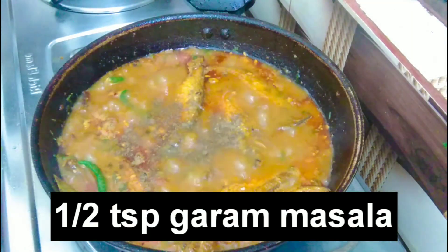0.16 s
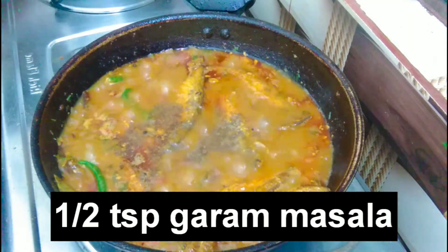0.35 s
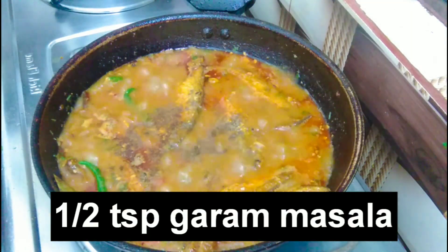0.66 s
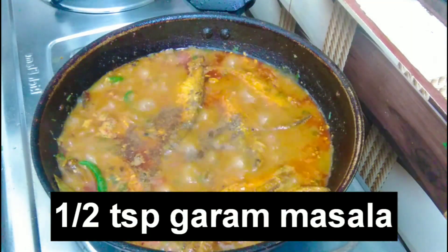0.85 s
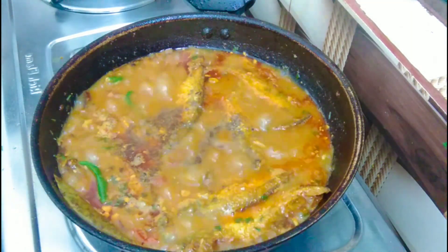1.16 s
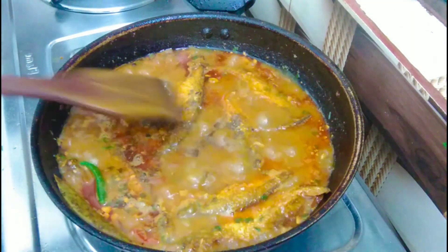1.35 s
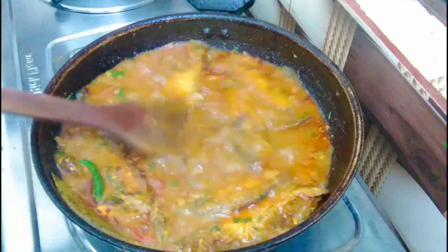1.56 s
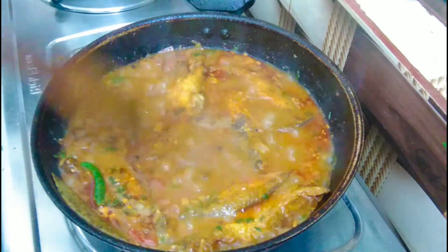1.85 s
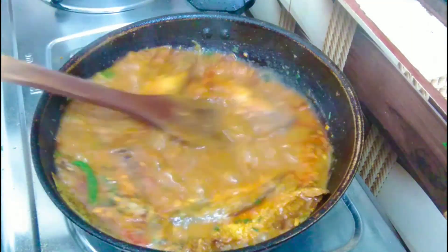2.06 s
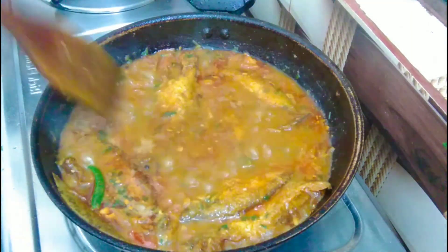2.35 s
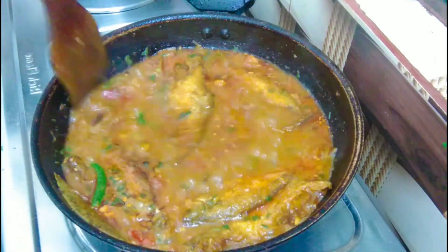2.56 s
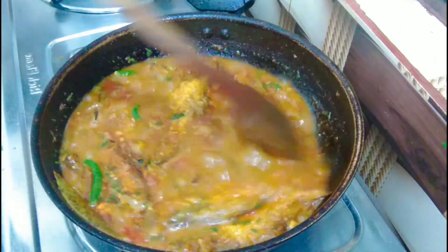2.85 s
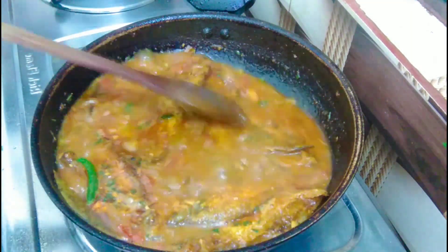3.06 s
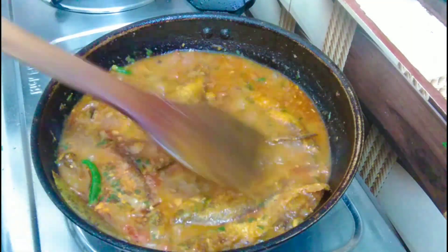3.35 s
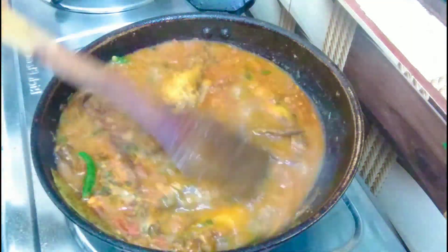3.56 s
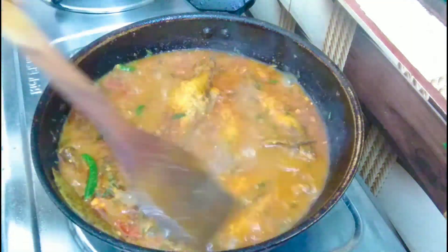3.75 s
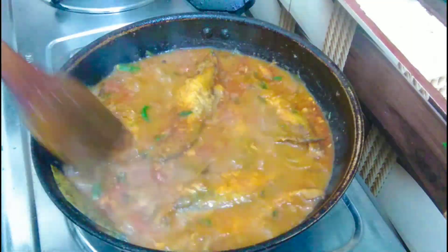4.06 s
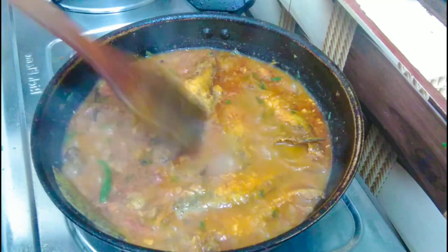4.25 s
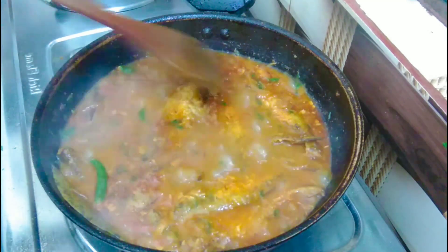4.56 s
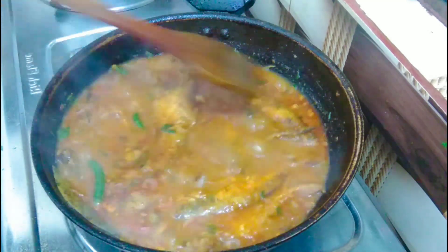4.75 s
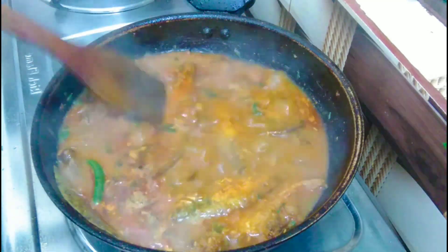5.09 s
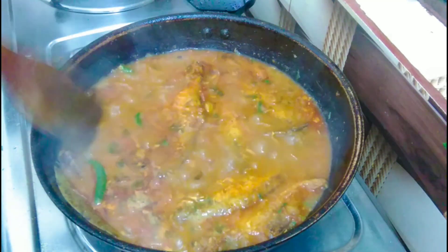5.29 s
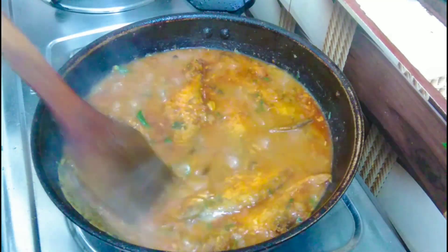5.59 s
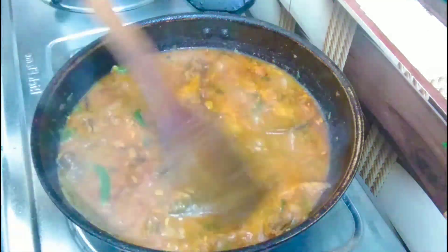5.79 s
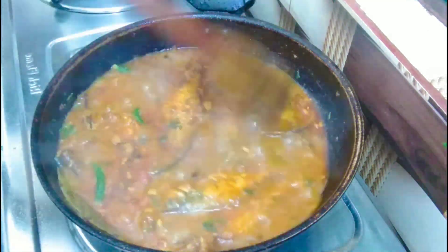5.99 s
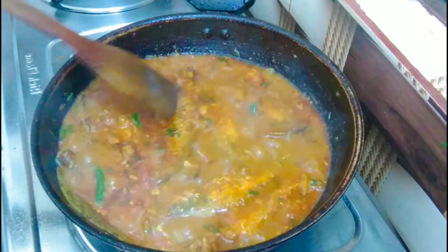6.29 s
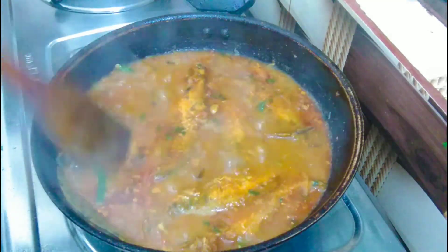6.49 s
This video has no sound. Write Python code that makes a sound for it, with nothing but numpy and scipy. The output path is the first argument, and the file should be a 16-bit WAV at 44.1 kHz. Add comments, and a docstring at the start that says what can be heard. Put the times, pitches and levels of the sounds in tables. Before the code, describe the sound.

A thick curry simmers throughout, heard from close above in a small kitchen with short reflections. Fine bright fizz and coarser crackling froth fluctuate constantly, dotted with round wet pops, blips, faint low glugs and sharp oil spits. Around 0.6 s a short rasp of steam escapes with a soft scuff; a stronger pop comes near 0.95 s. The boil swells, then at 1.26 s everything drops silent for about a twentieth of a second and returns at 1.31 s with a hard, dry double click. From 2.5 s a wooden spoon gives muted knocks and drags, with low squelches; the clearest thud is at 3.56 s. A snappy pop lands at 4.03 s, the froth sinks around 4.3 s and recovers by 4.8 s. More soft knocks follow near 5.1, 5.4 and 5.7 s. Thin high steam whistles appear at 6.3 s, then a sharp spit at 6.5 s as simmering continues.

```python
"""Curry simmering in a pan

Curry simmers on a kitchen stove, heard from close above. Oil fizzes and froth crackles as swarms of
tiny ringing bubbles with noise; larger bubbles pop or glug as short notes, and drops spit as noise bursts.
A wooden spoon knocks the pan's ringing modes and squelches through the sauce; steam whistles thinly.
Early on, the sound drops out for an instant and returns with a sharp click.
"""
import sys
import numpy as np
from scipy import signal
from scipy.fft import rfft, irfft
from scipy.io import wavfile
from scipy.ndimage import uniform_filter1d

SR = 44100
rng = np.random.default_rng(int(sys.argv[2]) if len(sys.argv) > 2 else 0)


def file_out(sig):
    """Save sig as 16-bit WAV at sys.argv[1]."""
    # one column per channel
    cols = np.atleast_2d(sig).T
    # limit, then scale
    lim = np.clip(cols, -1, 1)
    pcm = np.round(lim * 32767).astype(np.int16)
    wavfile.write(sys.argv[1], SR, pcm)


N = 292383
TIME = np.arange(N) / SR
SWELL_LIMIT = 1.2  # random swells stop growing here, in multiples of their rms


def gain_of(db):
    """Turns decibels into an amplitude factor."""
    return 10 ** (np.asarray(db) / 20)


def evened(x):
    """Scales a sound to an rms of 1."""
    return x / np.sqrt(np.mean(x ** 2) + 1e-20)


def read(points, hz):
    """Reads a curve between its points on a log-frequency axis."""
    f, value = np.transpose(points)
    return np.interp(np.log(hz + 1), np.log(f + 1), value)


def follow(rows):
    """Draws one gain curve over the whole scene for each level column."""
    s, *columns = np.transpose(rows)
    return [gain_of(np.interp(TIME, s, column)) for column in columns]


def add(mix, s, sound):
    """Mixes a sound in at a time in seconds."""
    part = mix[max(round(s * SR), 0):][:len(sound)]
    part += sound[:len(part)]


def coloured(x, spectrum):
    """Filters a sound to a spectrum, with no response before its cause (minimum phase)."""
    hz = abs(np.fft.fftfreq(4096, 1 / SR))
    log_gain = np.log(gain_of(read(spectrum, hz)))
    taps = np.fft.ifft(np.exp(np.conj(signal.hilbert(log_gain)))).real
    return signal.oaconvolve(x, taps[:len(taps) // 2])[:len(x)]


def wander(rate_hz):
    """Makes a random drift of rms 1, with movement faster than the rate smoothed away."""
    hz = np.fft.rfftfreq(N, 1 / SR)
    smoothed = rfft(rng.standard_normal(N)) / (1 + (hz / rate_hz) ** 2)
    return evened(irfft(smoothed, N))


def restless(depth_db):
    """A gain that drifts by chance as patches of the pan boil up and settle."""
    return gain_of(depth_db * wander(rate_hz=21.7))


def ring(hz, cycles):
    """A bursting film: the cavity swells into its note over the given cycles, then dies away."""
    turns = np.arange(int(8 * cycles * SR / hz) + 2) * hz / SR
    u = turns / cycles
    return u * np.exp(1 - u) * np.sin(2 * np.pi * turns)


def swarm(per_s, low_hz, high_hz, cycles, spread_db, clump_db, count=24):
    """Bubbles of many sizes burst at random, like sizes in clumps; a few are far louder than the rest."""
    out = np.zeros(N)
    # six neighbouring sizes share one clump
    for sizes_hz in np.geomspace(low_hz, high_hz, count).reshape(-1, 6):
        clump = gain_of(clump_db * np.minimum(wander(18), SWELL_LIMIT))
        for hz in sizes_hz:
            chance, size = rng.random(N), rng.exponential(1, N)
            at = chance < per_s / count / SR
            clicks = np.zeros(N)
            clicks[at] = clump[at] * gain_of(spread_db * np.minimum(size[at], 3))
            note = rng.choice([-1, 1]) * ring(hz, cycles) * np.sqrt(hz)
            out += signal.oaconvolve(clicks, note)[:N]
    return evened(out)


def patchy(x, depth_db, span_s, span_hz):
    """Groups of like-sized bubbles come and go: the level drifts in patches of time and pitch."""
    z = signal.stft(x, SR, nperseg=256, noverlap=192)[2]
    field = rng.standard_normal(z.shape)
    for _ in range(2):
        field = uniform_filter1d(field, max(round(span_s * SR / 64), 1), axis=1)
        field = uniform_filter1d(field, max(round(span_hz * 256 / SR), 1), axis=0)
    gain = gain_of(depth_db * np.minimum(evened(field), SWELL_LIMIT))
    return signal.istft(z * gain, SR, nperseg=256, noverlap=192)[1][:N]


def sizzle(frothing):
    """Levels of fizz and froth, sinking in lulls and flaring on hot metal; and a gain for the coarse fizz."""
    # lulls in which the sizzle dies away: middle t/s, length/s, fizz sinks by/dB, froth sinks by/dB
    lulls = [(0.122, 0.023, 5, 17), (0.312, 0.079, 2.5, 6), (0.983, 0.044, 5, 20), (1.467, 0.12, 0, 10),
             (1.632, 0.042, 1, 15), (1.682, 0.03, -1, 11), (2.05, 0.038, 3, 3), (2.435, 0.073, 1.5, 6),
             (2.637, 0.13, 2.5, 7), (3.498, 0.035, 6, 3), (3.706, 0.059, 8, 5), (4.323, 0.076, 7.5, 23),
             (4.537, 0.042, 4, 5), (4.655, 0.14, 1.5, 24), (4.826, 0.078, -0.5, 27), (5.314, 0.058, 2.5, 7),
             (5.776, 0.11, -1.5, 10.5), (6.013, 0.12, 5, 1.5), (6.572, 0.026, 8, -4)]
    # the spoon washes sauce onto hot metal: t/s, length/s, fizz level/dB, froth level/dB
    flares = [(0.708, 0.023, -62, -49.5), (1.991, .03, -50, -46), (2.525, 0.084, -49.5, -49.5),
              (2.764, 0.17, -55.5, -52), (3.202, 0.017, -46.5, -52), (3.721, 0.015, -61, -37),
              (3.863, 0.027, -46, -47.5), (4.026, 0.017, -43.5, -49), (4.397, 0.096, -52, -53.5),
              (4.555, 0.023, -48.5, -57), (5.03, 0.092, -48, -53.5), (5.528, 0.049, -48.5, -47),
              (6.083, 0.096, -48, -46), (6.181, 0.073, -51, -45), (6.283, 0.079, -53, -54),
              (6.425, 0.024, -46, -58)]
    fizz_db, fizz_restless_db, froth_restless_db = -51, 1, 3.5
    rise_s, fall_s = 0.0061, 0.0033
    sink_db = 0
    for s, length, *depths in lulls:
        sink_db = sink_db + np.outer(depths, np.exp(-(2 * (TIME - s) / length) ** 4))
    flare = 0
    for s, length, *dbs in flares:
        rise = np.clip((TIME - s) / rise_s, 0, 1)
        fall = np.exp(-np.maximum(TIME - s - length, 0) / fall_s)
        flare = flare + np.outer(gain_of(dbs), rise * fall)
    steady_fizz = gain_of(fizz_db) * restless(fizz_restless_db)
    steady_froth = frothing * restless(froth_restless_db)
    steady = np.array([steady_fizz, steady_froth])
    fizz_level, froth_level = np.hypot(steady * gain_of(-sink_db), flare)
    return fizz_level, froth_level, gain_of(-.5 * sink_db[1])


def fizz(level):
    """Tiny steam bubbles crackle in the oil over a restless hiss, with fine dry prickles on top."""
    # colour of the fizz: f/Hz, relative level/dB
    spectrum = [(2500, -59), (3300, -6.5), (4100, -5), (5000, -4), (6000, -5.5), (7400, -1), (8600, -4.5),
                (10000, -9), (11500, -18), (13000, -25), (15000, -80)]
    crackle = swarm(per_s=1800, low_hz=4410, high_hz=11460, cycles=3.4, spread_db=4.5, clump_db=7.5, count=18)
    prickles = swarm(per_s=400, low_hz=3800, high_hz=8000, cycles=1, spread_db=4, clump_db=2, count=6)
    noise = rng.standard_normal(N) * gain_of(4.4 * wander(69))
    hiss = patchy(noise, depth_db=3.0, span_s=.012, span_hz=610)
    parts = [(crackle, -4), (prickles, -7), (hiss, -3.5)]
    return level * sum(gain_of(db) * evened(coloured(x, spectrum)) for x, db in parts)


def pings(level, db=-11):
    """A few small bubbles in the oil hold their note for some milliseconds."""
    notes = swarm(per_s=90, low_hz=4000, high_hz=9000, cycles=9, spread_db=3, clump_db=2, count=36)
    return level * gain_of(db) * notes


def bubbles(level):
    """Steam domes burst on the sauce: some with a dull pop, nearly as many with a round blip."""
    # colour of the bubbling sauce: f/Hz, relative level/dB
    spectrum = [(100, -26), (500, -46), (850, 6.5), (1150, 3.5), (1450, -0.5), (2300, 0.5), (2650, 11),
                (3100, -34), (3600, -29), (9000, -36)]
    bursts = swarm(per_s=330, low_hz=1250, high_hz=2100, cycles=1.5, spread_db=2.7, clump_db=5.5, count=18)
    blips = swarm(per_s=260, low_hz=1300, high_hz=2400, cycles=3, spread_db=3.2, clump_db=4.5, count=30)
    return level * coloured(gain_of(-4.5) * bursts + gain_of(-5.5) * blips, spectrum)


def calmed(x, coarse_gain, low_hz=2600, high_hz=4500):
    """In a lull the coarser bubbles sink further and leave a hollow between the pops and the fine fizz."""
    band = signal.butter(2, [low_hz, high_hz], "band", fs=SR, output="sos")
    coarse = signal.sosfiltfilt(band, x)
    return x + (coarse_gain - 1) * coarse


def froth(level):
    """Patches of coarser foam boil up and collapse in a dense, uneven crackle."""
    # colour of the froth: f/Hz, relative level/dB
    spectrum = [(600, -42), (1200, -21), (2300, -3.5), (3050, -6.5), (3900, -3.5), (4600, -6), (5600, -9),
                (8000, -17), (14000, -68)]
    foam = swarm(per_s=600, low_hz=2500, high_hz=5130, cycles=2, spread_db=3.5, clump_db=3.5, count=18)
    patches = patchy(foam, depth_db=4.5, span_s=0.0074, span_hz=700)
    return level * gain_of(-3.3) * evened(coloured(patches, spectrum))


def churn(level):
    """Bubbles leaving the bottom of the pan make soft low glugs over a faint rumble."""
    # colour of the low sounds: f/Hz, relative level/dB
    spectrum = [(25, -55), (55, -4), (85, 14.5), (115, 5.5), (170, 2.5), (260, 5), (400, -4.5), (540, -2.5),
                (680, -3), (1100, 14.5), (2000, -56)]
    glugs = swarm(per_s=90, low_hz=104.0, high_hz=643, cycles=1.43, spread_db=5.0, clump_db=2.5)
    rumble = coloured(rng.standard_normal(N) * gain_of(1 * wander(42)), spectrum)
    return level * (gain_of(3.0) * evened(coloured(glugs, spectrum)) + gain_of(-2.5) * evened(rumble))


def hollow(level):
    """Broken gurgles in the boil ring the low note of the pan."""
    gurgles = swarm(per_s=90, low_hz=635, high_hz=730, cycles=3.5, spread_db=3, clump_db=4, count=12)
    return level * gurgles


def murmur(bubbling, db=-64.0, share=0.98, at_db=-56):
    """Muffled boiling deep in the sauce surges and follows the bubbling; db holds at bubbling of at_db."""
    # colour of the deep boil: f/Hz, relative level/dB
    spectrum = [(30, -28), (120, -7.5), (300, -4.5), (530, -15.5), (670, 1), (820, -22), (1100, -15.5),
                (1500, 11), (3000, -12.5), (12000, -46)]
    surges = gain_of(5 * np.minimum(wander(30), SWELL_LIMIT))
    patches = patchy(rng.standard_normal(N) * surges, depth_db=12, span_s=0.021, span_hz=300)
    return gain_of(db) * evened(coloured(patches, spectrum)) * (bubbling / gain_of(at_db)) ** share


def kitchen(x):
    """Dense reflections from stove and walls, each band dying at its own speed."""
    # how long the room takes to fade by 60 dB: f/Hz, fade/s
    fade_times = [(150, 0.15), (1500, 0.11), (3000, 0.12), (12000, 0.069)]
    taps = rng.standard_normal(SR // 2) * (np.arange(SR // 2) > .003 * SR)
    hz, t, z = signal.stft(taps, SR, nperseg=256)
    fade = gain_of(-60 * t / read(fade_times, hz)[:, None])
    tail = signal.istft(z * fade, SR, nperseg=256)[1]
    return signal.fftconvolve(x, tail / np.linalg.norm(tail))[:N]


def pops(pop_db=3, glug_db=0, spatter_db=-18, spatter_s=0.016):
    """The largest bubbles: a round pop on the surface with the spatter of its film, or a low glug from below."""
    # large bubbles bursting: t/s, relative level/dB, f/Hz, swell/cycles (under 1 sharp, over 2 round)
    bursts = [(0.0363, -45, 1550, 1), (0.051, -37.5, 1480, 1), (0.096, -38.5, 1510, 2.7),
              (0.141, -37, 2570, 2.2), (0.338, -34.5, 1330, 1.1), (0.378, -31.5, 1510, 1.1),
              (0.404, -36.5, 1640, 0.9), (0.4333, -45, 1510, 1), (0.475, -37.5, 1620, 0.81),
              (0.5738, -35.5, 1500, 1.2), (0.958, -27.5, 1600, 0.9), (0.999, -43, 1480, 1.5),
              (1.009, -40, 1560, 1.8), (1.509, -34.5, 1720, 1.2), (1.585, -40, 1660, 1.5),
              (1.931, -35, 1460, 0.57), (1.95, -30, 2360, 2.4), (2.039, -40.5, 1510, 1.3),
              (2.077, -37, 1720, 0.74), (3.0042, -35.5, 1484, 1.6), (3.417, -36.5, 2400, 1.5),
              (3.696, -43, 1494, 4), (4.0327, -25, 2750, 0.35), (4.381, -40.5, 2270, 3),
              (4.4161, -35, 1590, 1.6), (4.545, -44, 1480, 7.4), (4.617, -44, 1830, 1.8),
              (4.634, -39.5, 1570, 2.5), (4.7402, -29.5, 1610, 0.7), (4.857, -29, 1800, 0.7),
              (4.996, -37.5, 2020, 0.85), (5.167, -41, 2320, 3.3), (5.388, -41, 1580, 2.9),
              (5.415, -33.5, 1240, 1.7), (5.547, -34.5, 2460, 1.4), (5.6014, -36, 2050, 1.8),
              (5.893, -38, 2240, 2.4), (5.921, -36, 1900, 1.4), (5.943, -34.5, 1960, 2.2),
              (6.537, -41.5, 2450, 3.1), (6.56, -40, 1980, 2.4), (6.567, -34, 1620, 0.57)]
    # gurgles behind the spoon and big bubbles leaving the bottom: t/s, level/dB, f/Hz
    glugs = [(0.009, -48, 198), (0.08, -50, 123.4), (0.095, -46, 680), (0.237, -56, 252), (0.278, -50, 300),
             (0.402, -48, 111), (0.497, -48, 272), (0.787, -49, 660), (1.026, -50.5, 540),
             (1.208, -48.5, 307), (1.699, -50, 225), (1.812, -46.5, 700), (2.133, -51.5, 610),
             (2.173, -52.5, 155), (2.405, -51, 730), (3.005, -48.5, 108), (3.127, -55, 161),
             (3.642, -52, 159), (3.941, -46, 112), (4.009, -44, 154), (4.095, -52.5, 121),
             (5.275, -52, 726), (5.549, -52.5, 218), (6.2, -47.5, 166), (6.479, -47, 670),
             (6.609, -46, 680)]
    out, t = np.zeros(N), np.arange(SR // 14) / SR
    for s, db, hz, cycles in bursts:
        note = ring(hz, cycles)
        torn = signal.fftconvolve(rng.standard_normal(len(t)), note)[:len(t)]
        spatter = evened(torn) * np.exp(-t / spatter_s)
        add(out, s, gain_of(db + pop_db) * note)
        add(out, s, gain_of(db + spatter_db) * spatter)
    # a bursting film is too small to give out much sound below 940 Hz
    out = signal.sosfilt(signal.butter(4, 940, "high", fs=SR, output="sos"), out)
    for s, db, hz in glugs:
        add(out, s, gain_of(db + glug_db) * ring(hz, cycles=1.9))
    return out


def spits(tick_s=.0013, spray_s=0.011):
    """Water bursts in hot oil: a sharp tick and a short spray."""
    # spitting drops: t/s, relative level/dB, centre f/Hz, spray against tick/dB
    drops = [(0.0509, -28.5, 8100, -11), (0.1, -36.5, 7660, -13), (0.159, -37, 7400, -11),
             (0.571, -35, 4220, -18), (1, -36, 7400, -3), (1.6528, -29, 6700, -17), (1.744, -33.5, 6250, 0),
             (1.864, -33, 5900, -22), (2.1151, -30, 7160, -20), (2.186, -32.5, 4700, -25),
             (2.349, -35, 5540, -14), (2.941, -29.5, 5000, -12), (3.2812, -32.5, 5960, -18),
             (3.4147, -35, 6700, -16), (3.5734, -31.5, 5330, 10), (3.8274, -29.5, 4670, -13),
             (4.091, -41, 3650, 1), (4.6028, -27.5, 7100, -22), (5.6435, -32, 4120, -3),
             (6.096, -32.5, 6360, 0), (6.5055, -23.5, 4400, -14)]
    out, t = np.zeros(N), np.arange(SR // 20) / SR
    for s, db, hz, spray_db in drops:
        shape = np.exp(-t / tick_s) + gain_of(spray_db) * np.exp(-t / spray_s)
        burst = rng.standard_normal(len(t)) * shape
        peak = [(hz / 8, -26), (hz / 2, -10), (hz, 0), (hz * 1.41, -6), (hz * 1.7, -36)]
        spit = coloured(burst, peak)
        # the first 2.5 ms set the level
        add(out, s, gain_of(db - 5.0) * spit / np.std(spit[:SR // 400]))
    return out


def splutter(middle_s=.608, rise_s=0.011, fall_s=0.015, db=-30):
    """A pocket of steam escapes in one short rasp of noise."""
    # colour of the rasp: f/Hz, relative level/dB
    spectrum = [(60, -19), (120, 1.5), (900, 1.5), (2200, -11), (3200, -0.5), (4100, 6), (5600, -10),
                (7300, 6), (8400, -2), (10000, -18), (15000, -27)]
    shape = np.exp(-np.maximum((middle_s - TIME) / rise_s, (TIME - middle_s) / fall_s) ** 1.4)
    return gain_of(db) * shape * evened(coloured(rng.standard_normal(N), spectrum))


def spoon(scuff=1.0, slips_per_s=400, width_share=0.062, rise_cycles=0.89,
          sag_share=.1, sag_s=0.0072, count=3):
    """Wood strikes or drags in small slips; hard blows ring higher modes, and notes sag as sauce closes in."""
    # spoon against the pan: t/s, level/dB, hardness as tilt/dB per octave, contact/s, lowest ringing f/Hz
    knocks = [(0.609, -44, 5, 0.026, 200), (2.528, -41.5, 2.5, 0.02, 285), (2.591, -51, -6, 0.01, 247),
              (2.699, -46, -6.5, 0.022, 223), (2.77, -51, -11.5, 0.045, 240), (3.289, -47, -4, 0.012, 130),
              (3.558, -38, -0.5, 0.0042, 257), (3.6, -48.5, -4, 0.013, 172),
              (3.786, -46.5, -3, 0.0041, 161), (3.987, -49, -5, 0.011, 190), (4.86, -54, -5.5, 0.0066, 280),
              (5.117, -46.5, -2.5, 0.016, 140), (5.416, -40.5, 3, 0.016, 325),
              (5.663, -46.5, -5, 0.016, 190), (5.693, -44.5, -4, 0.012, 191),
              (6.157, -50.5, -2.5, 0.021, 176)]
    # modes of the pan, damped by its load of sauce: f/Hz, relative level/dB, time to fade by 60 dB/s
    modes = [(108.7, 12, 0.21), (159.5, 6, 0.2), (222.5, -1, 0.13), (300, 2.5, 0.044), (341, -1, 0.037),
             (398, 1.5, 0.052), (519, -1, 0.072), (655, 1.5, 0.058), (866, 3.5, 0.053), (1057, 0.5, 0.018),
             (1248, -2, 0.034), (1430, -2.5, 0.01)]
    # a drag builds up over this share of its contact; contacts shorter than this land as a blow
    drag_swell_share, hard_contact_s = 0.27, 0.019
    out, t = np.zeros(N), np.arange(SR // 3) / SR
    sagging = t + sag_share * sag_s * (1 - np.exp(-t / sag_s))
    for s, db, tilt_db, contact, lowest_hz in knocks:
        pressure = (1 - np.exp(-t / (drag_swell_share * contact))) * np.exp(-t / contact)
        slips = rng.standard_normal(len(t)) * (rng.random(len(t)) < slips_per_s / SR)
        push = scuff * pressure * slips
        push[0] += np.exp(-(contact / hard_contact_s) ** 2)
        knock = np.zeros(len(t))
        for hz, mode_db, t60 in modes:
            # the moving sauce smears each mode into a cluster
            cluster = hz * (1 + width_share * rng.uniform(-1, 1, (count, 1)))
            phase = cluster * sagging + rng.random((count, 1))
            tone = np.sin(2 * np.pi * phase).sum(0)
            shape = (1 - np.exp(-(t * hz / rise_cycles) ** 2)) * gain_of(-60 * t / t60)
            strength = gain_of(mode_db + tilt_db * np.log2(hz / 400)) / (1 + (lowest_hz / hz) ** 6)
            knock += strength * evened(signal.fftconvolve(push, shape * tone)[:len(t)])
        # the first 40 ms set the level
        add(out, s, gain_of(db) * knock / np.std(knock[:SR // 25]))
    return out


def whistles(waver_share=0.015):
    """Steam squeezing through pinholes sounds as thin notes of unsteady pitch."""
    # whistles: t/s, length/s, f/Hz, level/dB
    notes = [(0.77, 0.035, 8333, -54), (4.51, 0.032, 5960, -49.5), (6.312, 0.066, 9329, -49.5),
             (6.31, 0.06, 11143, -56.5), (6.535, 0.025, 10050, -58), (6.533, 0.038, 10750, -63)]
    out, waver = np.zeros(N), 1 + waver_share * wander(70)
    for s, length, hz, db in notes:
        pitch = hz * waver[round(s * SR):][:round(length * SR)]
        tone = np.sin(2 * np.pi * np.cumsum(pitch) / SR)
        add(out, s, gain_of(db) * evened(tone * signal.windows.tukey(len(pitch), .5)))
    return out


def click(crack_db=-10.5, crack_hz=2850, echo_db=-3, echo_s=0.00269, tail_db=-25, decay_s=0.0059):
    """One hard, dry crack with a weaker repeat and a brief ragged tail of noise."""
    # colour of the tail: f/Hz, relative level/dB
    spectrum = [(50, -17), (200, -5), (1100, -13), (2200, -3.5), (2900, -20), (3500, -3), (5600, -9.5),
                (7700, -11.5), (11000, -19), (13000, -32), (16000, -46)]
    t = np.arange(SR // 80) / SR
    noise = rng.standard_normal(len(t)) * np.exp(-t / decay_s)
    snap = gain_of(tail_db) * evened(coloured(noise, spectrum))
    crack = gain_of(crack_db) * ring(crack_hz, cycles=1.3)
    add(snap, 0, crack)
    add(snap, echo_s, gain_of(echo_db) * crack)
    return snap


def resonate(x, hz, width_hz):
    """A resonance that can follow a moving pitch."""
    turn = np.exp(2j * np.pi * np.cumsum(hz * np.ones(len(x))) / SR)
    r = np.exp(-np.pi * width_hz / SR)
    return 2 * (turn * signal.lfilter([1 - r], [1, -r], x / turn)).real


def squelches(width_share=0.176, films_per_s=900, purity=0.43):
    """Tearing wet films ring a cavity that changes size; its own note sounds through the tearing."""
    # the spoon ploughs pockets whose note falls as they open and climbs as they close:
    # t/s, length/s, start f/Hz, end f/Hz, level/dB
    pockets = [(2.548, 0.039, 365, 289, -50), (2.593, 0.045, 306, 260, -52.5),
               (2.703, 0.056, 413, 370, -46), (2.715, 0.039, 877, 840, -53),
               (2.775, 0.133, 180, 151, -49.5), (2.925, 0.028, 270, 390, -57.5),
               (3.565, 0.032, 515, 226, -40), (3.787, 0.044, 250, 200, -46.5),
               (3.292, 0.043, 260, 150, -49), (3.924, 0.021, 320, 310, -51),
               (4.307, .065, 1705, 3120, -51.5), (5.122, 0.038, 152, 188, -50),
               (5.82, 0.03, 250, 300, -48.5), (5.855, 0.043, 223.5, 159, -51.5),
               (5.994, 0.042, 362, 206, -48.5), (6.157, 0.033, 292, 200, -47.5)]
    out = np.zeros(N)
    for s, length, start_hz, end_hz, db in pockets:
        pitch = np.geomspace(start_hz, end_hz, round(length * SR))
        tears = rng.standard_normal(len(pitch)) * (rng.random(len(pitch)) < films_per_s / SR)
        width = pitch.mean() * width_share
        gurgle = evened(resonate(resonate(tears, pitch, 2 * width), pitch, 2 * width))
        wobble = evened(uniform_filter1d(rng.standard_normal(len(pitch)), SR // 200))
        note = evened(np.sin(2 * np.pi * np.cumsum(pitch * (1 + width_share * wobble)) / SR))
        squelch = (purity * note + (1 - purity) * gurgle) * signal.windows.tukey(len(pitch), .5)
        add(out, s, gain_of(db) * evened(squelch))
    return out


def scene():
    """The pan and the spoon in the kitchen."""
    # how hard the sauce boils; stirring calms it, then it comes up again:
    # t/s, coarse frothing level/dB, bursting bubbles relative level/dB
    simmer = [(0, -58.5, -49.5), (.3, -55.5, -48), (.85, -56.5, -51), (1.15, -51.5, -48.5),
              (1.4, -50.5, -50.5), (1.95, -58, -51.5), (2.27, -57.5, -57), (2.6, -53, -51), (3.2, -59, -58),
              (3.45, -53.5, -53), (3.92, -53.5, -55.5), (4.1, -51.5, -52.5), (4.3, -63, -56),
              (4.76, -53.5, -51.5), (5.08, -54, -52), (5.33, -55, -52.5), (5.5, -51.5, -51),
              (6.63, -54.5, -52)]
    # low churning of the sauce: t/s, relative level/dB
    churn_curve = [(0, -58.5), (.5, -67.5), (.75, -64.5), (1.2, -66.5), (1.7, -68.5), (2.0, -66.5),
                   (2.45, -72), (3.05, -71), (3.45, -73.5), (4.05, -70), (4.4, -75.5), (5.0, -70.5),
                   (5.3, -67.5), (6.2, -66), (6.6, -92)]
    # the hollow of the pan ringing under the boil: t/s, level/dB
    hollow_curve = [(0, -71.5), (.9, -61.5), (1.5, -64.5), (1.85, -64.5), (2.05, -79), (2.45, -61),
                    (2.9, -75.5), (3.25, -61.5), (3.7, -72), (4.6, -73.5), (5.2, -67), (5.55, -60.5),
                    (5.9, -65.5), (6.28, -55), (6.4, -70), (6.63, -68)]
    frothing, bubbling = follow(simmer)
    churn_level, = follow(churn_curve)
    hollow_level, = follow(hollow_curve)
    fizz_level, froth_level, coarse_gain = sizzle(frothing)
    boil = fizz(fizz_level) + pings(fizz_level) + bubbles(bubbling * restless(depth_db=2))
    surface = calmed(boil, coarse_gain) + froth(froth_level)
    depths = churn(churn_level) + hollow(hollow_level) + murmur(bubbling)
    pan = surface + depths + pops() + spits() + splutter() + spoon() + whistles() + squelches()
    return (pan + gain_of(-11) * kitchen(pan))[None]


def record(dry):
    """The sound drops out briefly and returns with a click; then the treble above 15.4 kHz is cut."""
    # the silent gap: start t/s, end t/s
    stop, resume = (1.262, 1.3075)
    out = dry[0] * ((TIME < stop) | (TIME > resume))
    add(out, resume, click())
    low_pass = signal.firwin(255, 15400, window=("kaiser", 9), fs=SR)
    return signal.oaconvolve(out, low_pass, "same")[None]


dry = scene()
out = record(dry)
file_out(out)
```